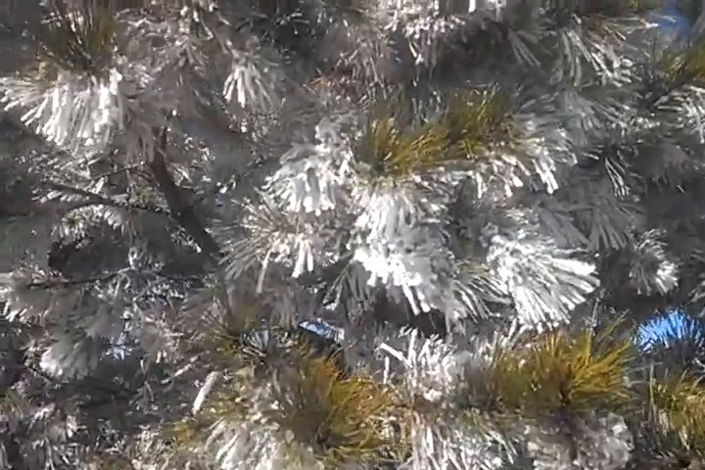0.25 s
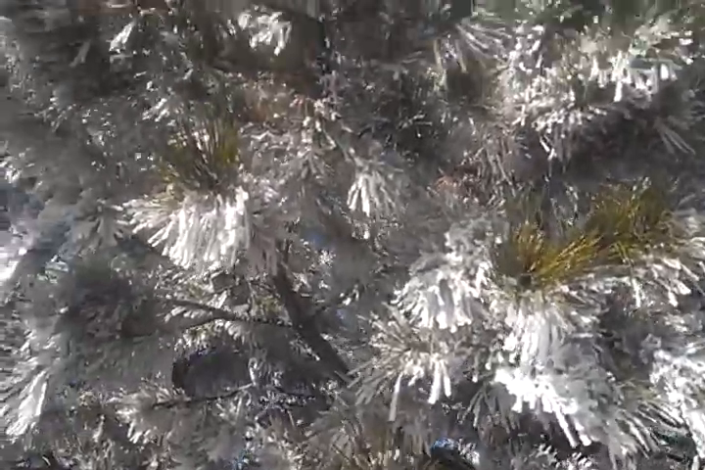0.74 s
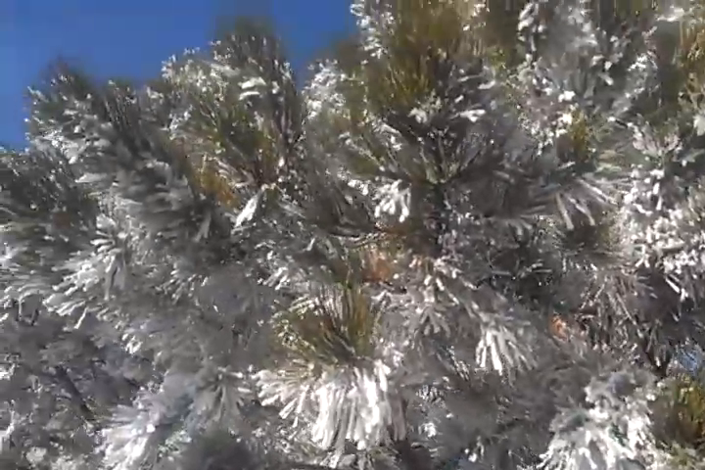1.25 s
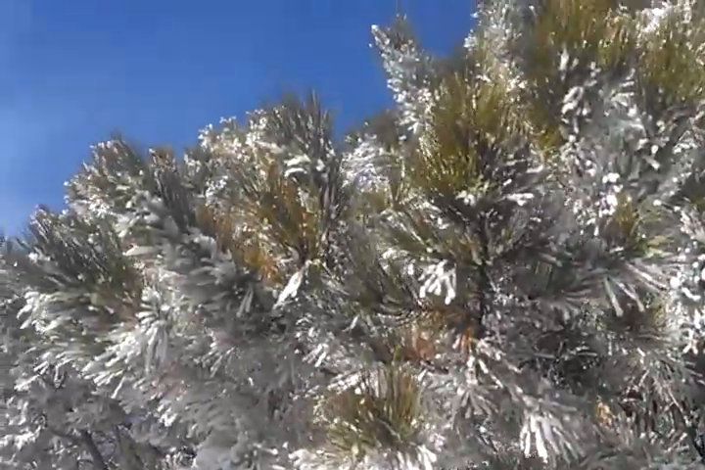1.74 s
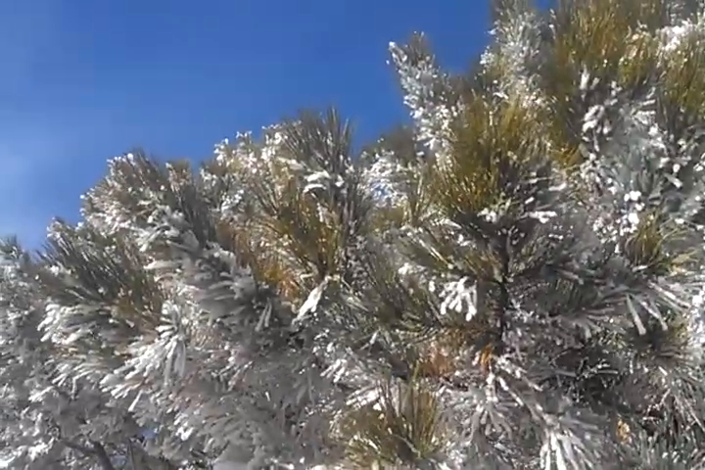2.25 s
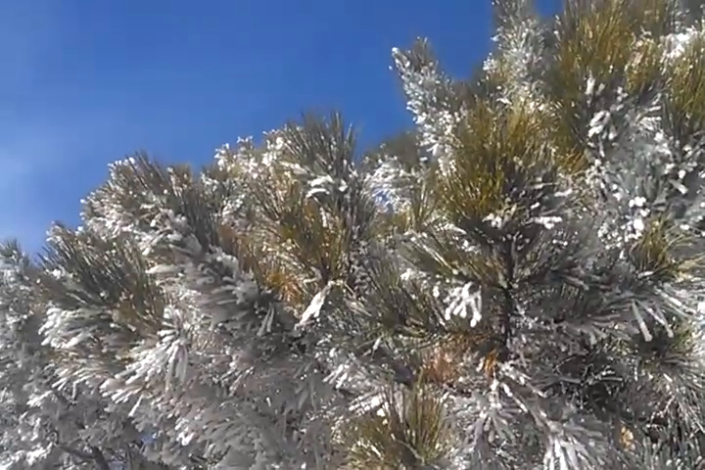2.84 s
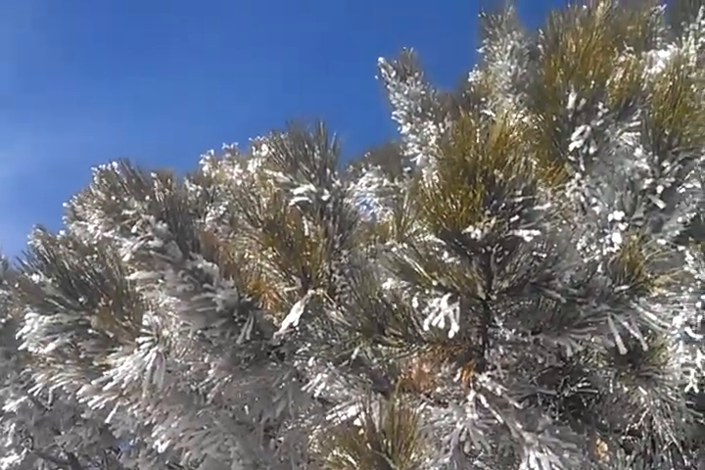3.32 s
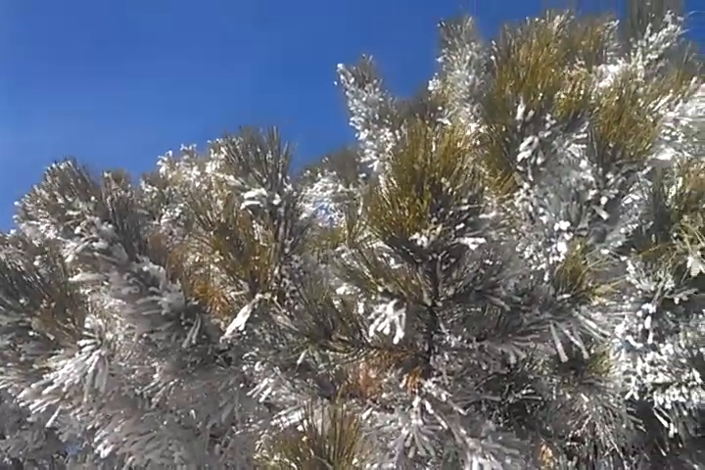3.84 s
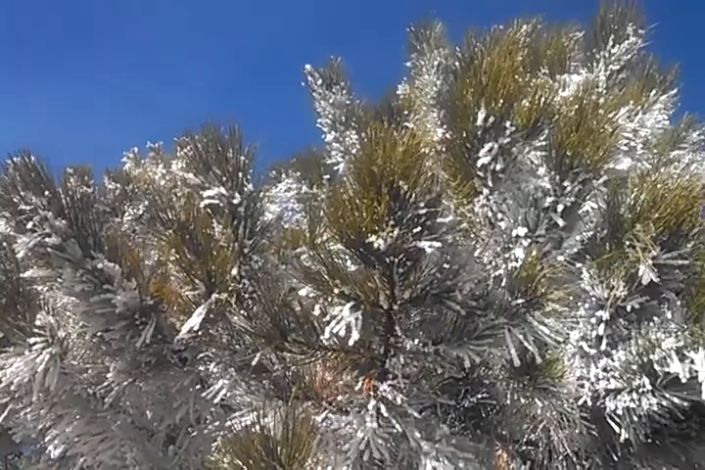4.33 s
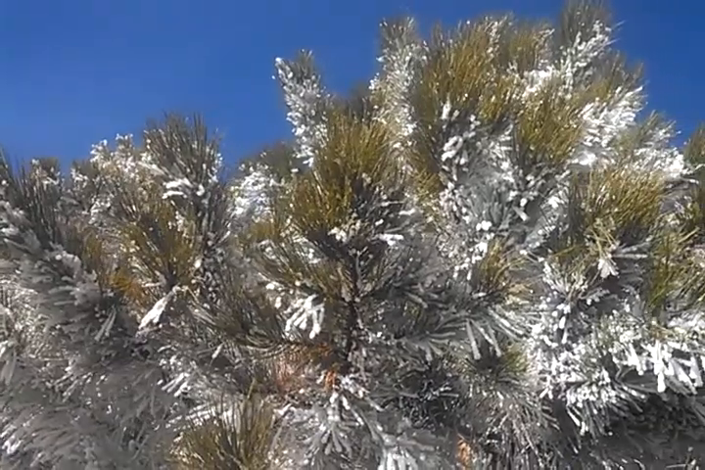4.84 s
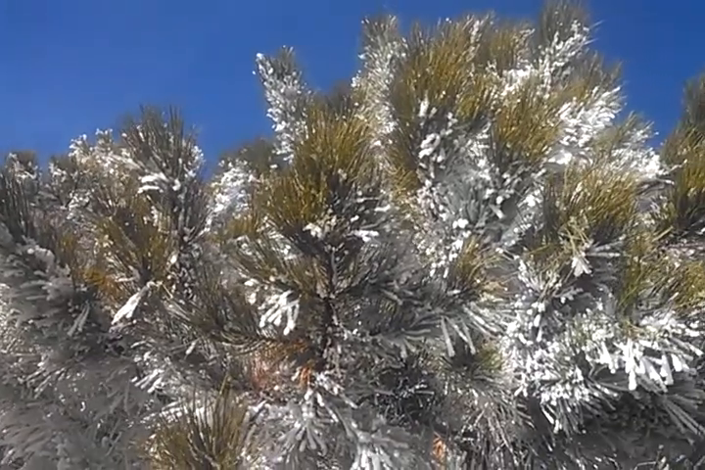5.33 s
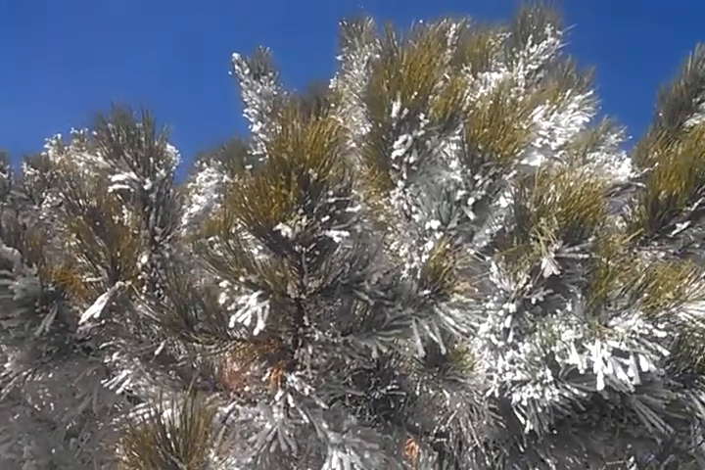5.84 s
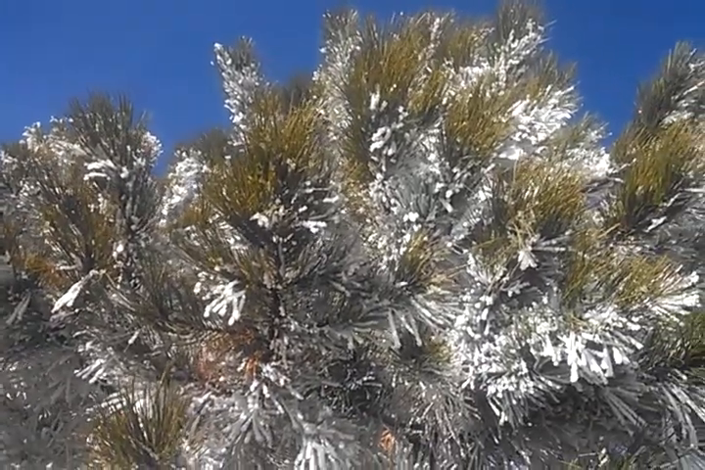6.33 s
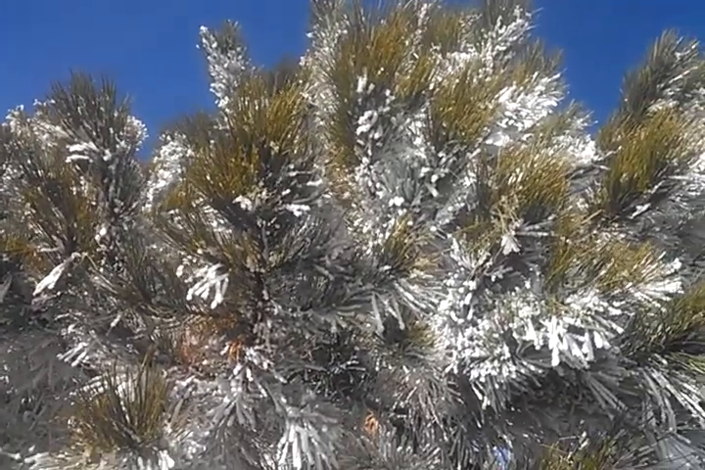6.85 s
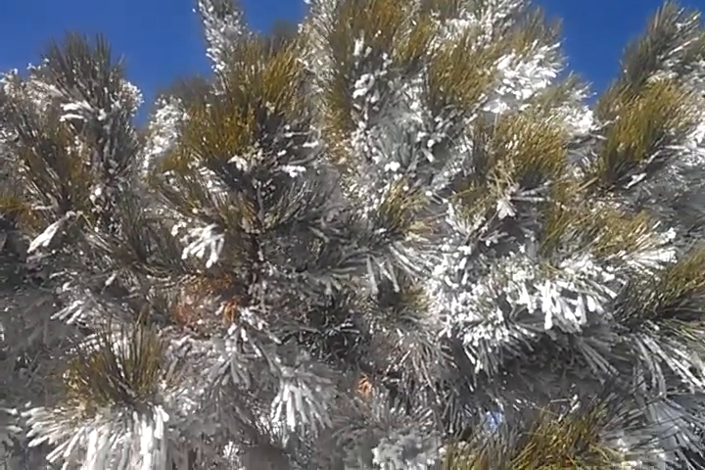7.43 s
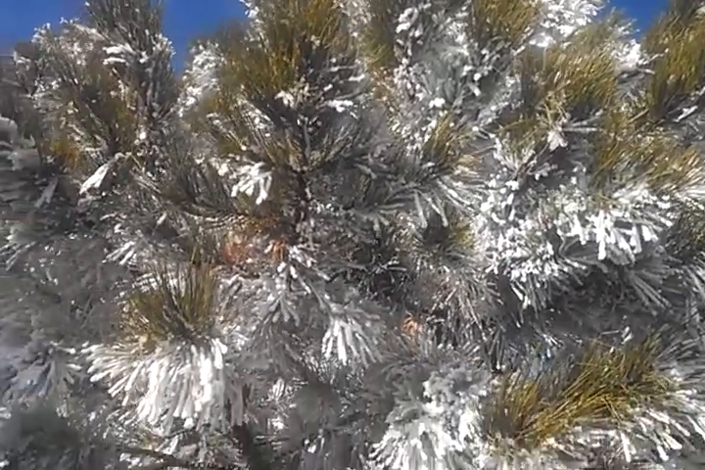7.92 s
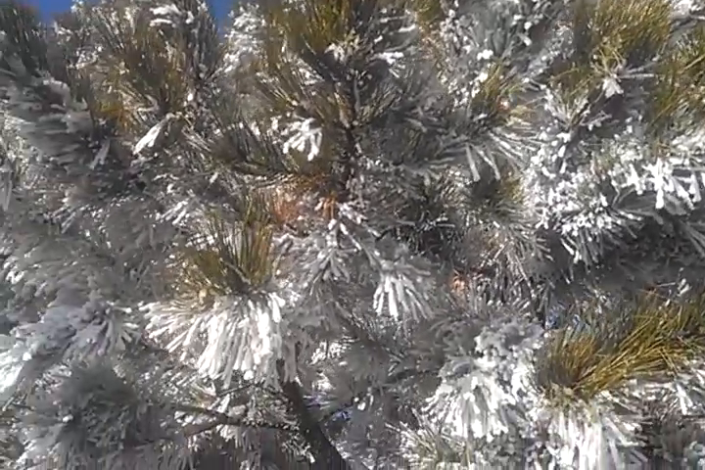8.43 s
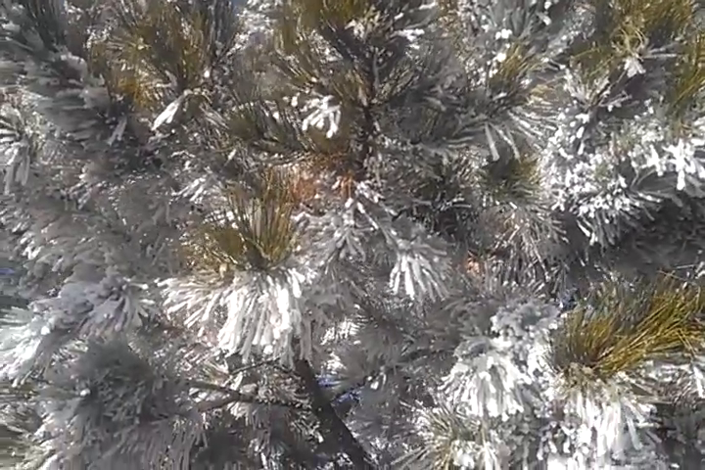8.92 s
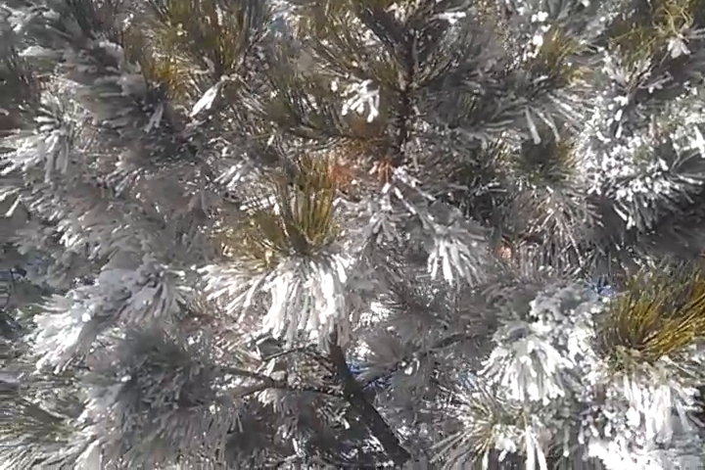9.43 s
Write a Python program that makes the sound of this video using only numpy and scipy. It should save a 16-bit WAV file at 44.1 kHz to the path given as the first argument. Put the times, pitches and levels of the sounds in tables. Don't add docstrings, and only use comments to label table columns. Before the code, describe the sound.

Close among frosted pine twigs outdoors, tiny bright drops tick irregularly over a faint fizz of distant dripping and low wind. Ice crumbs rattle dully on wood. A very sharp crack hits the microphone case before two seconds, then a distant crow caws hoarsely several times. Drips and rattles continue, with a second, fuller knock near seven seconds and a cluster of crumbs near nine.

```python
import sys
import numpy as np
from scipy import signal
from scipy.fft import rfft, irfft, next_fast_len
from scipy.io import wavfile
from scipy.ndimage import uniform_filter1d, map_coordinates

SR = 44100
rng = np.random.default_rng(int(sys.argv[2]) if len(sys.argv) > 2 else 0)


def attenuation_scalar(level_db):
    decades = np.asarray(level_db, float) / 20
    return 10 ** decades


def unload_wav(signal):
    wavfile.write(
        sys.argv[1],
        SR,
        np.round(np.clip(np.atleast_2d(signal).T, -1, 1) * 32767).astype(np.int16),
    )


N = 426447

# time_s, level_db
BREEZE = [(0.0, -60), (0.48, -58), (1.21, -61), (1.67, -59), (1.99, -60.5), (2.56, -62), (2.72, -60.5),
          (3.79, -61), (3.93, -59), (4.23, -57.5), (4.63, -63), (6.11, -60), (6.57, -65), (7.24, -60.5),
          (8.56, -61.5), (9.07, -59.5), (9.32, -63.5), (9.67, -62)]
# centre_s, over_breeze_db, half_width_s
GUSTS = [
    (.3, 5, 0.23),
    (1.44, 7, 0.073),
    (3.31, 7, .05),
    (3.94, 5.5, 0.17),
    (4.9, 8, 0.061),
    (6.46, 7.5, 0.057),
    (7.94, 3, 0.42),
    (9.67, 12, .07),
]
# start_s, peak_db, pitch_hz
PUFFS = [
    (1.416, -30, 61),
    (3.71, -21, 78),
    (9.599, -30, 63.6),
]
# frequency_hz, density_db
RUMBLE = [(12, -9), (25, -19.5), (40, 3.5), (60, 4), (80, 0.5), (110, -4), (200, -20), (500, -31.5),
          (900, -60)]
# frequency_hz, density_db
SOUGH = [(60, -21), (150, 4.4), (250, 1.5), (400, -1.5), (700, -8.5), (1000, -11.5), (1500, -14),
         (2200, -17.5), (3200, -18.5), (5000, -31.5), (9000, -30)]
# frequency_hz, density_db
FIZZ = [(1500, -11.5), (4000, -5.5), (6500, -6.5), (9000, -14.5), (11500, -12), (13500, -5), (15200, -5)]
# frequency_hz, t60_s
WOODS = [(300, 0.86), (2000, 0.33), (10000, 0.058)]
# start_s, length_s, rise_s, top_pitch_hz, level_db
CAWS = [
    (2.564, 0.2, 0.042, 558, -61.5),
    (2.926, 0.18, 0.023, 461.5, -66),
    (3.31, 0.28, .12, 575.4, -60),
    (3.73, .22, .06, 605.5, -54),
    (3.964, 0.191, 0.025, 462, -65.5),
    (4.167, .17, .045, 606, -55),
]
# frequency_hz, gain_db
THROAT = [(300, -59), (800, -66), (1150, -13), (1400, -2), (1650, -1), (2100, -23), (3000, -15),
          (5000, -50)]
# frequency_hz, gain_db
SPRAY = [(2000, -40), (5000, -1.5), (9000, -16), (13000, -7.1), (15500, -11)]
# start_s, peak_db
TICKS = [(0.276, -52), (0.33, -56), (0.383, -53), (0.4638, -55), (0.7943, -53), (0.867, -49.5),
         (0.9185, -54), (1.0262, -52), (1.1854, -55), (1.3245, -51), (2.5331, -50), (2.7765, -52),
         (3.114, -51), (3.2605, -51), (3.8626, -51), (3.9186, -52), (4.3388, -50), (4.4236, -50),
         (4.473, -52), (4.534, -50), (4.678, -51), (4.749, -47), (4.866, -55), (4.9177, -52), (5.0615, -51),
         (5.2325, -51), (5.5668, -52), (6.365, -48), (7.7572, -53.5), (8.9297, -52)]
# start_s, peak_db, pitch_hz
DRIPS = [(0.205, -45.5, 13800), (0.2412, -49.5, 10700), (0.999, -43, 12300), (1.043, -49, 11900),
         (1.2853, -38.5, 12700), (1.726, -43.5, 8800), (2.458, -46, 6620), (3.1321, -46, 11400),
         (3.789, -48.5, 7100), (3.9885, -44, 8500), (4.0017, -47.5, 8900), (4.1498, -49, 10330),
         (4.27, -44, 10800), (4.4844, -50, 4570), (4.9508, -45.5, 8850), (5.177, -41, 9800),
         (5.4777, -47, 10500), (5.542, -47.5, 11800), (5.711, -45, 12900), (6.1106, -43.5, 8700),
         (7.2155, -42, 6100), (7.4047, -50.5, 12100), (7.4476, -46.5, 8100), (7.661, -42.5, 7700),
         (7.8522, -45, 11900), (7.9572, -42.5, 11300), (8.281, -48, 11100), (8.6353, -46, 10600),
         (8.9037, -41.5, 11300), (9.619, -47, 11500)]
# start_s, peak_db, body_hz, t60_s, left_over_right_db
TAPS = [
    (0.836, -37, 1130, 0.0058, 3),
    (1.285, -33, 920, 0.016, 2),
    (3.29, -46.5, 356, 0.033, 22),
    (4.269, -47, 1410, 0.012, -3),
    (4.917, -50.5, 2050, 0.01, -14),
    (5.178, -39, 910, 0.0033, 2),
    (5.641, -44, 415, 0.03, -10),
    (9.0, -45.5, 414, 0.02, 0),
    (9.422, -48.5, 1310, 0.0072, 2),
]
# start_s, peak_db, twig_hz, t60_s
SCATTER = [(0.202, -34.5, 700, 1), (0.469, -39, 603, 0.087), (0.58, -45, 1240, 0.43),
           (0.699, -41, 466, 0.17), (0.817, -38.5, 940, 0.33), (1.766, -31.5, 637, 0.37),
           (2.026, -40, 795, 0.32), (2.735, -30, 410, 0.55), (2.829, -35.5, 1160, 0.25),
           (4.473, -34, 1085, 0.26), (5.798, -26.5, 454, 0.36), (6.036, -34.5, 1130, 0.21),
           (7.108, -46, 1190, 1), (7.351, -25, 418, 0.21), (8.286, -37.5, 479, 0.15),
           (8.622, -38.5, 1130, 0.12), (9.047, -25.5, 810, 0.17), (9.219, -27.5, 430, 0.29),
           (9.222, -35, 840, 0.28), (9.561, -49.5, 1280, 1)]
# start_s, peak_db, ice_hz, t60_s
CHIPS = [(0.469, -42, 3260, .09), (1.831, -50.5, 3700, 0.12), (2.026, -54, 3600, .2),
         (2.735, -50, 3650, 0.16), (2.829, -44, 3280, .2), (4.472, -38, 4180, 0.19),
         (6.036, -45.5, 4160, 0.13), (7.108, -46, 3500, 0.23), (7.352, -40, 3360, 0.13),
         (8.286, -38.5, 3870, 0.15), (8.622, -46.5, 3720, 0.11), (9.047, -33.5, 3270, 0.098),
         (9.22, -43, 3260, 0.13)]
# start_s, peak_db, contact_s, ring_db, left_over_right_db
BLOWS = [
    (1.7639, -2, .00007, -9, -16),
    (6.9636, -7, .0001, -1, -12),
]
# frequency_hz, level_db, silent_after_s
CASE = [
    [(356, -5, 0.018), (540, 3, 0.011), (900, 1, 0.0057), (1270, 4, 0.0042), (3470, 7.5, 0.0023),
     (4800, -2, 0.003)],
    [(270, -4, 0.016), (420, -2, 0.011), (560, 4, 0.0088), (774, 6, 0.0078), (1150, 4, 0.0066),
     (1610, 6, .004), (2900, -3, .004), (4600, -3, 0.003)],
]
# left_over_right_db, left_lag_s
RING_SIDE = [
    (-21, 0.00021),
    (-10.5, 0.000065),
]
# start_s, end_s, level_db, pitch_hz
SKID = (1.7502, 1.7645, -33, 1050)
BAND_EDGES = np.r_[0:200:8, 200:1025:16]


def unit(x):
    return x / np.sqrt(np.mean(x ** 2) + 1e-20)


def along(points, hz):
    f, v = np.transpose(points)
    return np.interp(np.log(hz + 1), np.log(f + 1), v)


def wobble(rate_hz):
    knots = rng.standard_normal((2, int(N * rate_hz / SR) + 4))
    place = np.arange(N) * rate_hz / SR
    return np.array([map_coordinates(k, [place]) for k in knots])


def filtered(x, response):
    m = next_fast_len(x.shape[-1] + 4096)
    spectrum = rfft(x, m) * response(np.fft.rfftfreq(m, 1 / SR))
    return irfft(spectrum, m)[..., :x.shape[-1]]


def resonance(centre_hz, q):
    return lambda f: 1j * f * centre_hz / q / (centre_hz ** 2 - f * f + 1j * f * centre_hz / q)


def rush(spectrum, patchy_db):
    z = signal.stft(rng.standard_normal((2, N)), nperseg=512)[2]
    field = rng.standard_normal(z.shape[1:])
    field = uniform_filter1d(uniform_filter1d(field, 8, 0), 8, 1)
    pair = signal.istft(z * attenuation_scalar(patchy_db * unit(field)), nperseg=512)[1][:, :N]
    return unit(filtered(pair, lambda hz: attenuation_scalar(along(spectrum, hz))))


def add(out, start_s, sound, pan_db):
    piece = out[:, round(start_s * SR):][:, :sound.shape[-1]]
    sides = attenuation_scalar(np.array([[pan_db / 2], [-pan_db / 2]]))
    piece += (sound * sides)[:, :piece.shape[1]]


def breeze():
    s, db = np.transpose(BREEZE)
    return np.interp(np.arange(N) / SR, s, db)


def air():
    stir_db = .9 * wobble(9)
    sough = attenuation_scalar(breeze() + 4.0 + stir_db) * rush(SOUGH, patchy_db=2.0)
    sough = sough * attenuation_scalar(np.array([[1.5], [-1.5]]))
    flicker_db = 1.8 * wobble(30)[0]
    return sough + attenuation_scalar(-68 + 1.0 + flicker_db) * rush(FIZZ, patchy_db=1.9)


def wind():
    mean_db, swing = -67.5, 0.94
    breeze_db = breeze()
    t = np.arange(N) / SR
    gust_db = sum(db * np.exp(-((t - s) / width) ** 2) for s, db, width in GUSTS)
    buffet_db = mean_db + swing * (breeze_db - breeze_db.mean()) + gust_db
    rumble = unit(attenuation_scalar(3 * wobble(9)) * rush(RUMBLE, patchy_db=1.1))
    out = attenuation_scalar(buffet_db + 17) * rumble
    t = np.arange(4410) / SR
    for s, db, hz in PUFFS:
        knock = np.sin(2 * np.pi * hz * t) * (1 - np.exp(-t / 0.0039))
        add(out, s, attenuation_scalar(db + 5.0 - 60 * t / 0.084) * knock, -6)
    return out


def woods(x):
    hz, t, z = signal.stft(rng.standard_normal((2, SR // 2)), SR, nperseg=256)
    decay = attenuation_scalar(-60 * t / along(WOODS, hz)[:, None])
    tail = signal.istft(z * decay, SR, nperseg=256)[1]
    return signal.fftconvolve(np.atleast_2d(x), tail / np.linalg.norm(tail[0]), axes=1)[:, :N]


def crow():
    rest_hz, onset_share = 436, .3
    attack_s, release_s, fade_db = 0.012, 0.038, 3.5
    t = np.arange(N) / SR
    hz, gain = np.full(N, float(rest_hz)), np.zeros(N)
    for s, length, rise, top_hz, db in CAWS:
        u = t - s
        onset = -np.arccos(np.sqrt(onset_share))
        arch = np.interp(u, [0, rise, length], [onset, 0, np.pi / 2])
        hz += (top_hz - rest_hz) * np.cos(arch) ** 2 * (u > 0)
        edges = np.clip(np.minimum(u / attack_s, (length - u) / release_s), 0, 1)
        gain += edges * attenuation_scalar(db - fade_db * np.clip(u / length - .5, -1, 1))
    phase = 2 * np.pi * np.cumsum(hz * (1 + .03 * wobble(150)[0])) / SR
    pulses = sum(np.cos(k * phase) for k in range(2, 6))
    pulses = pulses * (1 + .4 * np.cos(phase / 2))
    hoarse = 1 + .5 * wobble(220)[0]
    voice = filtered(attenuation_scalar(-2.5) * gain * pulses * hoarse, lambda f: attenuation_scalar(along(THROAT, f)))
    return voice * attenuation_scalar(np.array([[1.5], [-1.5]])) + attenuation_scalar(-5.5) * woods(voice)


def drizzle():
    count = 1500
    when, size = rng.random((count, 2)).T
    hits = np.zeros((2, N))
    hit_db = -66 + 7.3 * size ** 2 + 2.4 * rng.standard_normal((2, count))
    hits[:, (when * (N - 1)).astype(int)] = attenuation_scalar(hit_db)
    t = np.arange(300) / SR
    envelope = signal.fftconvolve(hits, attenuation_scalar(-60 * t / 0.021)[None], axes=1)[:, :N]
    spray = envelope * rng.standard_normal((2, N))
    return filtered(spray, lambda hz: attenuation_scalar(along(SPRAY, hz)))


def drips():
    out, t = np.zeros((2, N)), np.arange(1024) / SR
    faint = [(rng.random() * N / SR, -58.5 - 2.5 * rng.standard_normal()) for _ in range(110)]
    far = []
    for s, db in TICKS + faint:
        hz = 11500 * np.exp(.25 * rng.standard_normal())
        far.append((s, db, np.clip(hz, 4000, 15000)))
    for s, db, hz in DRIPS + far:
        burst = t / .0007 * np.exp(-t / .0007) + .04 * attenuation_scalar(-60 * t / .08)
        spray = rng.standard_normal((2, len(t))) * burst
        own, edge, splat = resonance(hz, q=1.4), resonance(14800, q=2.5), resonance(4500, q=.6)
        tick = filtered(spray, lambda f: .8 * own(f) - 1.3 * edge(f) + .25 * splat(f))
        add(out, s, attenuation_scalar(db - 15.0) * unit(tick), 1.8 * rng.standard_normal())
    return out


def taps():
    out, t = np.zeros((2, N)), np.arange(2048) / SR
    partials = [(.4, .9), (.7, .8), (1, 1), (1.4, .5)]
    for s, db, hz, t60, pan_db in TAPS:
        ring = sum(size * np.sin(2 * np.pi * ratio * hz * t) for ratio, size in partials)
        body = resonance(hz, q=.7)
        puff = filtered(rng.standard_normal((2, len(t))), lambda f: body(f) ** 2)
        add(out, s + 0.00026, attenuation_scalar(db - 60 * t / t60) * (ring + 0.63 * puff), pan_db)
    return out


def grains(t60):
    t = np.arange(SR // 5) / SR
    clumps = attenuation_scalar(1.5 * unit(uniform_filter1d(rng.standard_normal(len(t)), size=90)))
    envelope = attenuation_scalar(-60 * t / t60) * (1 - np.exp(-t / 0.00028))
    return rng.standard_normal((2, len(t))) * clumps * envelope


def scatter():
    out = np.zeros((2, N))
    for s, db, hz, t60 in SCATTER:
        twig, wood = resonance(hz, q=3.5), resonance(1400, q=.8)
        rattle = filtered(grains(t60), lambda f: twig(f) + .18 * wood(f) ** 2)
        add(out, s, attenuation_scalar(db - 1.5) * rattle, 0)
    for s, db, hz, t60 in CHIPS:
        add(out, s, attenuation_scalar(db) * filtered(grains(t60), resonance(hz, q=8)), 0)
    return out


def skid(out):
    s, end, db, hz = SKID
    noise = rng.standard_normal((2, round((end - s) * SR)))
    scrape = filtered(noise, lambda f: resonance(hz, q=.8)(f) ** 2 + .03)
    add(out, s, attenuation_scalar(db) * unit(scrape), -2)
    t = np.arange(SR // 6) / SR
    crumbs = filtered(rng.standard_normal((2, len(t))), lambda f: resonance(1000, q=.7)(f) ** 2)
    add(out, end + .002, attenuation_scalar(db - 12.0 - 60 * t / 0.29) * unit(crumbs), 0)


def blows():
    out, t = np.zeros((2, N)), np.arange(1500) / SR
    for (s, db, contact, ring_db, pan_db), modes, (side_db, lag) in zip(BLOWS, CASE, RING_SIDE):
        u = t / contact
        push = 1.2 * u ** 2 * (3 - u) * np.exp(-u)
        add(out, s, attenuation_scalar(db + pan_db / 2) * push, pan_db)
        crack = rng.standard_normal((2, len(t)))
        add(out, s, attenuation_scalar(db - 21 - 60 * t / 0.005) * crack, -3)
        port_t = t - np.array([[lag], [0]])
        ring = sum(attenuation_scalar(level - 60 * (t / life) ** 2) * np.sin(2 * np.pi * hz * port_t)
                   for hz, level, life in modes)
        add(out, s, attenuation_scalar(db + ring_db - 16.0) * ring * (1 - np.exp(-t / 0.0003)), side_db)
    skid(out)
    return filtered(out, lambda f: (1j * f / (150 + 1j * f)) ** 2)


def scene():
    near = taps() + scatter()
    since = np.arange(N) / SR - BLOWS[0][0] - .003
    duck = attenuation_scalar(-7 * (since > 0) * np.exp(-(since / 0.67) ** 2))
    background = drips() + drizzle() + wind() + air()
    return near + attenuation_scalar(-18.5) * woods(near) + blows() + crow() + duck * background


def joint(x):
    z = signal.stft(np.array([x[0] + x[1], x[0] - x[1]]) / 2, nperseg=2048)[2]
    power = np.add.reduceat(np.abs(z) ** 2, BAND_EDGES, axis=1)
    under_db = np.interp(BAND_EDGES, [40, 50, 150, 250], [60, 13, 12, 8])[:, None]
    kept = power > attenuation_scalar(-2 * under_db) * power[::-1]
    treble = power[:, 25:].sum(axis=(0, 1))
    kept |= treble > 3 * np.median(treble)
    kept = np.repeat(kept, np.diff(np.r_[BAND_EDGES, 1025]), axis=1)
    mid, side = signal.istft(z * kept, nperseg=2048)[1][:, :N]
    return np.array([mid + side, mid - side])


def band_limit(x):
    return signal.sosfilt(signal.butter(12, 16810, fs=SR, output="sos"), x)


def record(dry):
    cross_delay, cross_share = 16, .97
    top_hz = 15620
    late = np.pad(dry, ((0, 0), (cross_delay, 0)))[::-1, :N]
    wide = (dry - cross_share * late) * attenuation_scalar(np.array([[0], [1.7]]))
    top_edges = [top_hz - 200, top_hz + 100, 16450, 16500]
    top = filtered(wide, lambda hz: np.interp(hz, top_edges, [0, .5, .3, 0]))
    power = uniform_filter1d(np.sum(top ** 2, axis=0), size=256)
    loud = power > 2.5 ** 2 * np.median(power)
    click = uniform_filter1d(1. * loud, size=128)
    below = filtered(wide, lambda hz: np.interp(hz, top_edges[:2], [1, 0]))
    mix = np.clip(joint(below + click * top), -1, 1)
    return band_limit(mix)


dry = scene()
out = record(dry)
unload_wav(out)
```